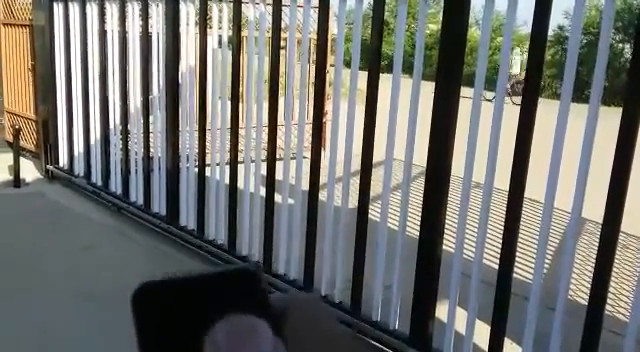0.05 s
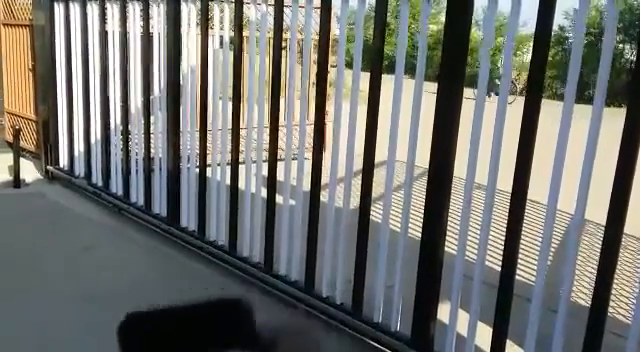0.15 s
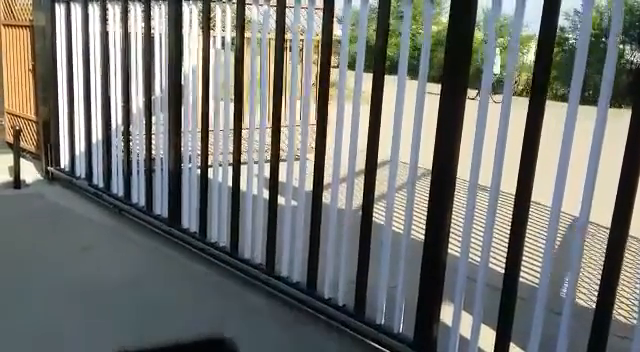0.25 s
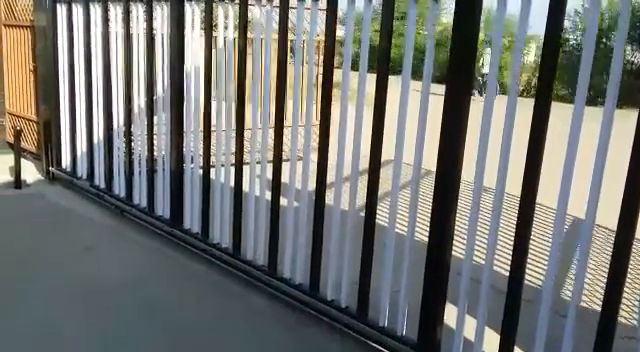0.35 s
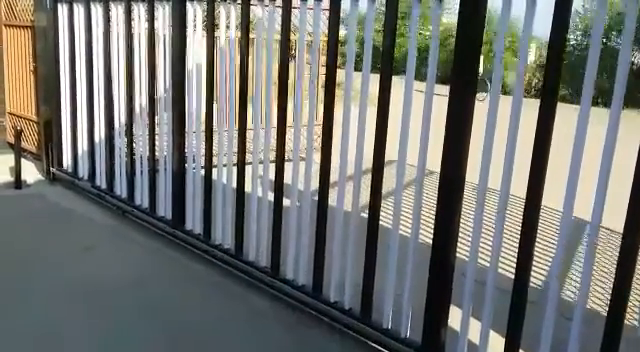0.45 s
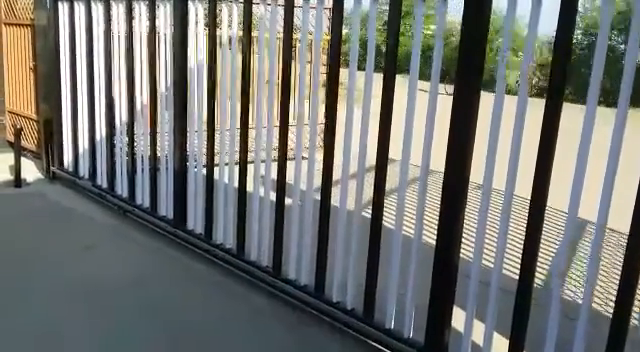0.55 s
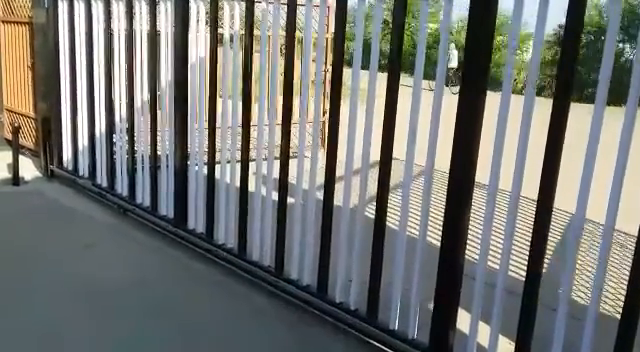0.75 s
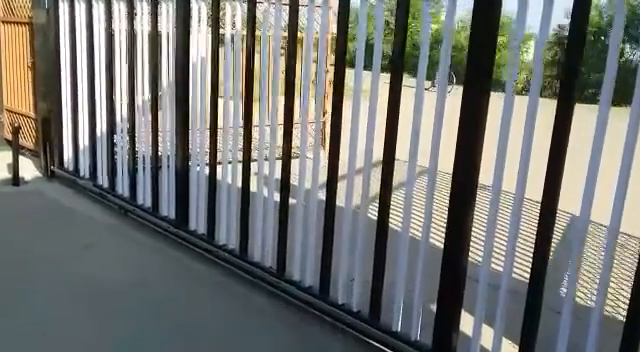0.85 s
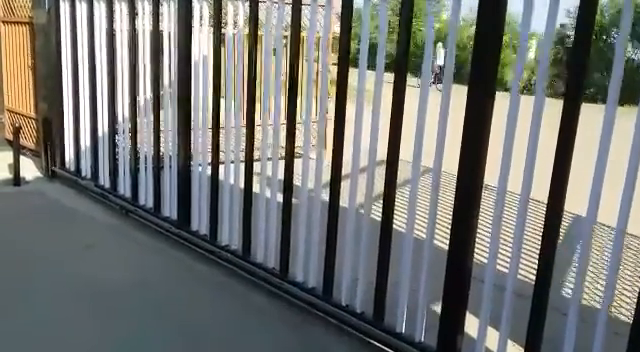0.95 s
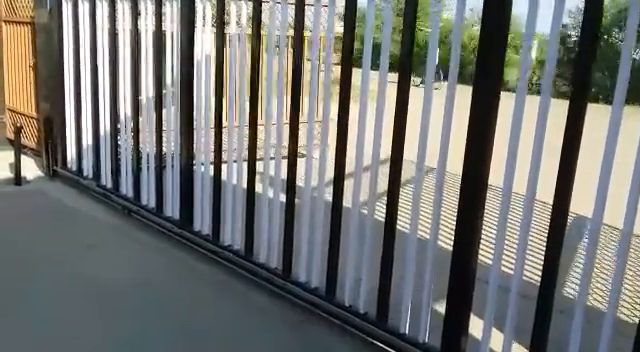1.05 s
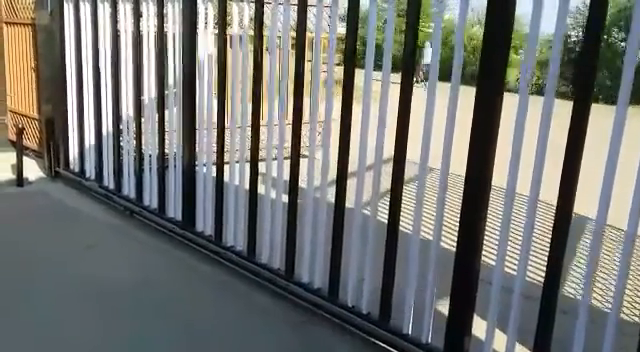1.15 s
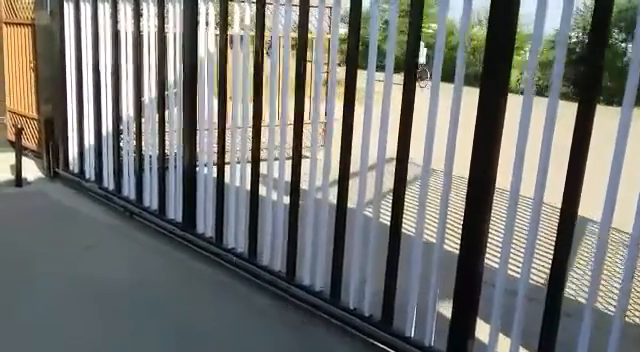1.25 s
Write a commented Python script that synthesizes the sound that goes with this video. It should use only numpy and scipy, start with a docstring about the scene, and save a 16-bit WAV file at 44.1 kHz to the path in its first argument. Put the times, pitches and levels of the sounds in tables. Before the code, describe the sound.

A steel sliding gate clanks sharply as its motor takes up the slack. It rattles and hums briefly, then rolls more quietly with whirring, chain scraping and a short wheel groan, heard from a few metres away outdoors.

```python
"""A motor starts a steel sliding gate outdoors, a few metres from the microphone.
First the drive takes up its slack with dull thuds, then it knocks the gate and sets the bars ringing.
As the gate gets under way, many small contacts rattle it and the straining frame hums.
It rolls on with rumbling wheels and a whirring drive, while the chain scrapes, ticks and clinks.
Near the end a wheel groans briefly and the drive gives a few soft knocks."""
import sys
import numpy as np
from scipy import signal
from scipy.fft import rfft, irfft
from scipy.io import wavfile

SR = 44100
rng = np.random.default_rng(int(sys.argv[2]) if len(sys.argv) > 2 else 0)


def master_out(mix):
    """Clip the mix to full scale and print it as 16-bit PCM to the path in sys.argv[1]."""
    frames = np.transpose(np.atleast_2d(mix))
    ceiling = np.clip(frames, -1, 1)
    pcm = np.round(ceiling * 32767).astype(np.int16)
    wavfile.write(sys.argv[1], SR, pcm)


N = 57330

# knocks of the drive on the gate: t/s, relative level/dB, chatter fade/s, treble limit f/Hz
DRIVE_KNOCKS = [(0.2111, -23, .003, 3000), (0.2161, 1.5, 0.0099, 13100), (0.2258, -11.5, 0.0073, 7000),
                (.269, -12.5, 0.0049, 3500), (.307, -15, 0.0097, 1800), (0.666, -22, 0.0042, 3480),
                (1.1226, -19, 0.0011, 1270), (1.133, -26.5, 0.02, 2000), (1.165, -24.5, 0.0035, 1000)]
# strongest ringing tones of the gate: f/Hz, relative level/dB, time to fade by 60 dB/s
GATE_TONES = [(162.8, -10.5, 0.58), (298.2, 0.5, 0.33), (430.2, 2, 0.17), (695, -2.5, 0.69), (763, 1, 0.56),
              (881.2, 7.5, 0.096), (991, -0.5, 0.37), (1300, 1.5, 0.38), (1775, 7.5, 0.15), (1882, 1, 0.42),
              (2245, 7, .19), (2322, 1, 0.41), (2672, -4.5, 0.3), (2900, -7.5, 0.32), (2974, -5, 0.46),
              (3230, -5, 0.37), (4290, -4, 0.26), (4380, 5.5, 0.13)]
# dense ringing of the many bars: f/Hz, relative level/dB
BAR_COLOUR = [(60, -44), (200, -19.5), (310, 2), (520, -3), (850, 1.5), (1150, -5), (1900, 2.5),
              (2600, -1.5), (3250, -2), (3700, -7), (4500, -6), (5300, -18.5), (7500, -36), (9800, -40.5),
              (16000, -72)]
# how long the bars ring: f/Hz, time to fade by 60 dB/s
BAR_FADE = [(150, 0.35), (700, 0.61), (2200, 0.4), (4500, 0.28), (10000, 0.16)]
# how hard the moving gate is shaken: t/s, relative level/dB
RATTLE_LEVEL = [(.3, -59), (.36, -36), (.395, -40.5), (.425, -33), (.46, -35), (.5, -33.5), (.56, -37),
                (.59, -44), (.615, -32.5), (.655, -39.5), (.71, -44.5), (.8, -57.5), (.99, -49), (1.1, -51),
                (1.14, -46.5), (1.21, -49), (1.3, -52)]
# tone colour of the rattle: f/Hz, gain/dB
RATTLE_FILTER = [(100, 6), (310, 2.5), (520, -.5), (750, 0.5), (1300, 3.3), (2400, -4.5), (4000, -6.5),
                 (7000, -2.5)]

# Resonances are the pitches at which a part likes to ring. Each pair of tables below gives
# the resonances (f/Hz, width/Hz, relative level/dB), then the loudness (t/s, level/dB).
# the frame straining as the gate speeds up
STRAIN_RESONANCES = [(244, 6.2, 3), (434, 11, -1), (574, 16, -1), (638, 16, -1), (775, 36, -3)]
STRAIN_LOUDNESS = [(.3, -83), (.44, -42), (.53, -41), (.66, -44.5), (.77, -52), (1.1, -74.5)]
# a wheel groaning
GROAN_RESONANCES = [(433, 14, -3.5), (637.6, 9.4, 4.5), (744, 11, -2.5), (846, 22, -2.5), (915, 14, -11.5)]
GROAN_LOUDNESS = [(.98, -92), (1.029, -45), (1.081, -44.5), (1.117, -60), (1.17, -45.5), (1.24, -74)]
# the frame rumbling as the wheels roll
RUMBLE_RESONANCES = [(65, 35, -7), (136, 10.4, -1), (164, 7.5, 6), (310.5, 55, -5.5)]
RUMBLE_LOUDNESS = [(.12, -63.5), (.19, -44), (.33, -46), (.48, -48.5), (.58, -52.5), (.8, -52.5),
                   (1., -51.5), (1.2, -54), (1.3, -57)]
# the drive whirring
WHIRR_RESONANCES = [(710, 200, -3), (1180, 93, 3.5), (1920, 66, 1), (2090, 24, 4), (2189, 46, 3),
                    (2745, 67, 2.5), (2893, 32, -4.5)]
WHIRR_LOUDNESS = [(.13, -67), (.2, -57.5), (.42, -47.5), (.7, -50.5), (1., -49.5), (1.07, -52), (1.19, -55),
                  (1.3, -51)]
# the chain scraping in its guide
SCRAPE_RESONANCES = [(3540, 380, -4), (3930, 98, 1.5), (4560, 250, -5), (5070, 99, 0.5), (5620, 130, -4.5)]
SCRAPE_LOUDNESS = [(.15, -92), (.38, -63), (.43, -55.5), (.59, -55), (.72, -51.5), (.99, -53.5),
                   (1.06, -61.5), (1.19, -57), (1.3, -61.5)]

# dull thuds of the drive: t/s, f/Hz, level/dB, rise/s
DRIVE_THUDS = [(0, 69, -36, 0.0026), (0.141, 61.6, -42.5, 0.01), (0.146, 327, -40, 0.01),
               (0.158, 157, -39.5, 0.0026), (0.172, 70.7, -41.5, 0.0087), (0.179, 139, -43.5, 0.014),
               (.305, 289, -38.5, 0.01), (0.626, 126.5, -46, .011), (0.867, 163, -41.5, 0.0096),
               (0.894, 297, -46, .012), (1.22, 143, -44, 0.0075)]
# light clinks of the chain: t/s, level/dB, fade/s
CHAIN_CLINKS = [(.008, -46.5, 0.0055), (.337, -45.5, 0.019), (0.408, -44, 0.056), (.485, -44, 0.017),
                (0.602, -46, 0.028), (0.621, -43, 0.028), (.687, -46, 0.0078), (.843, -47, 0.033),
                (1.132, -47.5, 0.017), (1.185, -48, 0.012), (1.243, -49, 0.014)]
# tone colour of the chain: f/Hz, relative level/dB
CHAIN_COLOUR = [(300, -8), (1500, 9), (3000, 9), (4700, 11.5), (6200, -2), (9000, -22), (15000, -24)]
# outdoor background: f/Hz, relative level/dB
AIR_COLOUR = [(20, -43), (40, 3.5), (70, -4.5), (300, -5.5), (800, -6.5), (2500, -11.5), (4500, -18.5),
              (7000, -25), (11000, -26), (16000, -29)]
# scattered sound compared with direct sound: f/Hz, level/dB
SCATTERED_SHARE = [(50, 6), (150, -37), (400, -47), (1000, -2), (2500, -6), (5000, 1.5), (9000, 10)]
# left microphone compared with the right: f/Hz, level/dB
LEFT_BALANCE = [(200, -1), (700, 0.5), (1300, 2.5), (2400, 8), (4400, 2.5), (8000, -12.5), (15000, -3)]
# how much later the left microphone hears the sound: f/Hz, delay/ms
LEFT_DELAY = [(300, 0.16), (700, 0.19), (1200, 0.36), (4000, 0.37)]

KNOCK_DB, CHATTER_DB = 13.5, -8.5  # boost for every knock; chatter compared with its first contact
STRIKE_DB, STRIKE_FADE_S = -16, 0.0051  # extra burst in the hard first instant of a tap
TONES_DB, RING_RISE_S = -4, 0.001  # tones compared with the bars; time for the ring to build up
RATTLES_PER_S, WHIRR_CONTACTS_PER_S, WHIRR_TOP_HZ = 500, 2700, 6800
TOOTH_HZ, TOOTH_DEPTH, TOOTH_WANDER = 88, 0.24, 0.0596  # depth and wander are fractions of 1
LINKS_PER_S, LINK_SPREAD_DB, LINK_FADE_S = 45, 2, .007
LINK_DB = -4.5  # ticking compared with the scrape
CLINK_RISE_S = 0.00068
AIR_DB, TOP_HZ = -57, 15870


def gate_ring():
    """One tap on the gate: a hard strike, then strong tones among the dense ringing of its bars."""
    t = since(0)
    noise = colour(rng.standard_normal((2, N)), BAR_COLOUR)
    centres = np.log([hz for hz, _ in BAR_FADE])
    bars = tones = 0
    # split the noise into pitch bands and let each fade at its own speed
    for weights, (_, fade_s) in zip(np.eye(len(centres)), BAR_FADE):
        band = shape(noise, lambda f: np.interp(np.log(f + 1), centres, weights))
        bars += band * undb(-60 * t / fade_s)
    for hz, db, fade_s in GATE_TONES:
        tone = np.sin(2 * np.pi * (hz * t + rng.random((2, 1))))
        tones += tone * undb(db - 60 * t / fade_s)
    strike = 1 + undb(STRIKE_DB) * np.exp(-t / STRIKE_FADE_S)
    onset = 1 - np.exp(-(t / RING_RISE_S) ** 2)
    ring = unit(bars * strike) + undb(TONES_DB) * unit(tones)
    return unit(onset * ring) / np.sqrt(N)


def knocks(ring):
    """Each knock rings the gate with one contact and a brief steel chatter; soft ones tend to be dull."""
    push = np.zeros(N)
    for start, db, fade_s, treble_hz in DRIVE_KNOCKS:
        age = since(start)
        chatter = rng.standard_normal(N) * (age > 0) * np.exp(-age / fade_s)
        contact = undb(CHATTER_DB) * unit(chatter) / np.sqrt(N)
        contact[int(start * SR)] += 1
        push += undb(db) * butter_filter(contact, 1, treble_hz)
    return undb(KNOCK_DB) * signal.fftconvolve(ring, push[None])[:, :N]


def rattle(spots=3):
    """Many small contacts shake the bars as the gate gathers speed; each spot rings in its own way."""
    pull = curve(RATTLE_LEVEL) * tooth_pull()
    ringing = 0
    for _ in range(spots):
        ring = gate_ring()
        taps = clicks(RATTLES_PER_S / spots, spread_db=0) * pull
        ringing += signal.fftconvolve(ring, taps[None])[:, :N]
    return colour(ringing, RATTLE_FILTER) / np.sqrt(spots)


def rubbing(resonances, loudness):
    """Rubbing sets the frame humming or groaning, throbbing with the pull of the drive."""
    hum = resonate(rng.standard_normal((2, N)), resonances)
    hum = butter_filter(hum, 2, [220, 1200], "bandpass")
    return unit(hum) * curve(loudness) * tooth_pull()


def wheel_rumble():
    """The wheels on their track shake the frame, which rings at its low pitches."""
    rumble = resonate(rng.standard_normal((2, N)), RUMBLE_RESONANCES)
    rumble = butter_filter(rumble, 3, [50, 900], "bandpass")
    return unit(rumble) * curve(RUMBLE_LOUDNESS)


def drive_thuds():
    """Soft pushes from the drive, each a low tone that swells and quickly dies away."""
    thuds = 0
    for start, hz, db, rise_s in DRIVE_THUDS:
        age = since(start)
        swell = age / rise_s * np.exp(1 - age / rise_s)
        phase = np.array([[0], [rng.random()]])
        thuds += undb(db) * swell * np.sin(2 * np.pi * (hz * age + phase))
    return thuds


def tooth_pull():
    """The pull of the drive pulses with each tooth, at a slightly unsteady rate."""
    wander = unit(shape(rng.standard_normal(N), lambda f: f < 10))
    rate_hz = TOOTH_HZ * (1 + TOOTH_WANDER * wander)
    return unit(1 + TOOTH_DEPTH * np.sin(2 * np.pi * np.cumsum(rate_hz) / SR))


def running_metal(resonances, loudness):
    """Tiny contacts in the running drive ring a metal part, so fast they blur into a whirr or scrape."""
    contacts = np.array([clicks(WHIRR_CONTACTS_PER_S, spread_db=2) for _ in range(2)])
    ringing = butter_filter(resonate(contacts, resonances), 4, WHIRR_TOP_HZ)
    return unit(ringing) * curve(loudness)


def chain_clinks(clinks):
    """Each clink of the chain is a burst of bright noise that starts sharply and fades fast."""
    bursts = 0
    for start, db, fade_s in clinks:
        age = since(start)
        bursts += undb(db) * (1 - np.exp(-age / CLINK_RISE_S)) * np.exp(-age / fade_s)
    return unit(colour(rng.standard_normal((2, N)), CHAIN_COLOUR)) * bursts


def chain_ticks():
    """Chain links tick unevenly over the toothed wheel, growing and fading with the scrape."""
    count = int(LINKS_PER_S * N / SR)
    timing, strength = rng.standard_normal((count, 2)).T
    starts = (np.arange(count) + timing / 2) / LINKS_PER_S
    ticks = chain_clinks([(s, db, LINK_FADE_S) for s, db in zip(starts, LINK_SPREAD_DB * strength)])
    return undb(LINK_DB) * unit(ticks) * curve(SCRAPE_LOUDNESS)


def outdoor_air():
    """A quiet, steady rush of noise, strongest in the bass."""
    return undb(AIR_DB) * unit(colour(rng.standard_normal((2, N)), AIR_COLOUR))


def microphones(pair):
    """Mix two signals, as direct and scattered sound, into left and right; the left hears it later."""
    f = np.arange(N + 1) * SR / (2 * N)  # the frequencies that shape() works on
    share = undb(at_hz(SCATTERED_SHARE, f))
    direct, scattered = shape(pair, lambda f: np.array([np.ones_like(f), share]) / np.hypot(1, share))
    lean_left = undb(at_hz(LEFT_BALANCE, f) / 2)
    delay = np.exp(-2j * np.pi * f * at_hz(LEFT_DELAY, f) / 1000)
    return shape(np.array([direct + scattered, direct - scattered]),
                 lambda f: np.array([lean_left * delay, 1 / lean_left]))


def clicks(per_s, spread_db):
    """Small contacts at random times; spread_db sets how much their strength varies."""
    hits = (rng.random(N) < per_s / SR) * rng.choice([-1, 1], N)
    return unit(hits * undb(spread_db * rng.standard_normal(N)))


def resonate(x, table):
    """Let a sound ring each resonance in a table, and add them up with alternating signs."""
    return sum((-1) ** k * undb(db) * signal.lfilter(*signal.iirpeak(hz, hz / width, fs=SR), x)
               for k, (hz, width, db) in enumerate(table))


def butter_filter(x, order, hz, kind="lowpass"):
    """Keep what lies below one frequency, or between two; a higher order cuts more sharply."""
    return signal.sosfilt(signal.butter(order, hz, kind, fs=SR, output="sos"), x)


def shape(x, response):
    """Multiply each frequency f in a sound by response(f)."""
    return irfft(rfft(x, 2 * N) * response(np.arange(N + 1) * SR / (2 * N)))[..., :N]


def colour(x, table):
    """Turn frequencies up or down by a table of f/Hz, level/dB."""
    return shape(x, lambda f: undb(at_hz(table, f)))


def at_hz(table, hz):
    """Read between the rows of a table, giving every octave equal room."""
    f, values = np.array(table).T
    return np.interp(np.log(np.maximum(hz, 1)), np.log(f), values)


def curve(table):
    """Gain over time from a table of t/s, level/dB."""
    return undb(np.interp(since(0), *np.array(table).T))


def since(start):
    """Seconds since a start, zero before it."""
    return np.maximum(np.arange(N) / SR - start, 0)


def undb(db):
    """Turn decibels into a gain to multiply by."""
    return 10 ** (np.asarray(db) / 20)


def unit(x):
    """Scale to an average strength (rms) of 1."""
    return x / np.sqrt(np.mean(x ** 2))


def scene():
    """The gate and its drive over a quiet outdoor background."""
    gate = knocks(gate_ring()) + rattle() + wheel_rumble()
    strain = rubbing(STRAIN_RESONANCES, STRAIN_LOUDNESS)
    groan = rubbing(GROAN_RESONANCES, GROAN_LOUDNESS)
    whirr = running_metal(WHIRR_RESONANCES, WHIRR_LOUDNESS)
    scrape = running_metal(SCRAPE_RESONANCES, SCRAPE_LOUDNESS)
    drive = whirr + scrape + chain_clinks(CHAIN_CLINKS) + chain_ticks() + drive_thuds()
    return microphones(gate + strain + groan + drive) + outdoor_air()


def record(dry):
    """Cut off the very highest treble."""
    return signal.sosfilt(signal.ellip(10, .1, 70, TOP_HZ, fs=SR, output="sos"), dry)


dry = scene()
out = record(dry)
master_out(out)
```